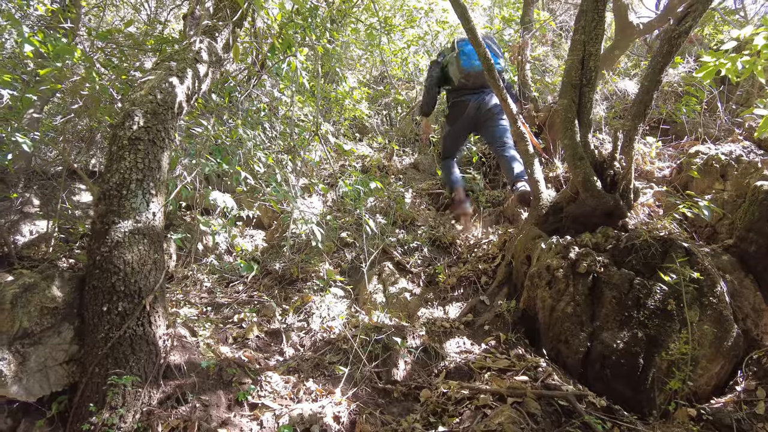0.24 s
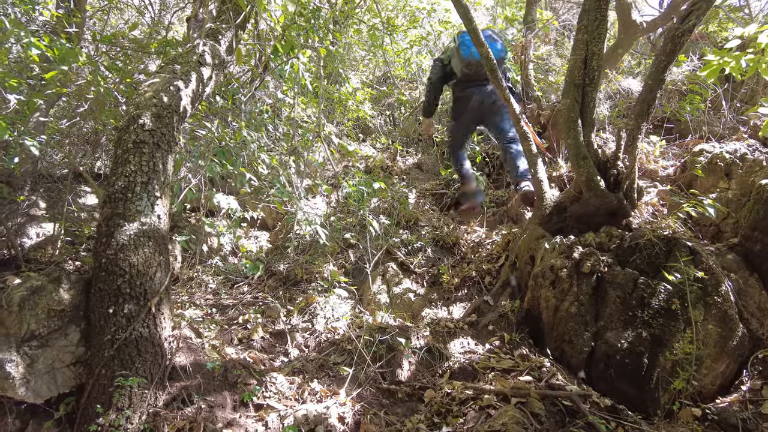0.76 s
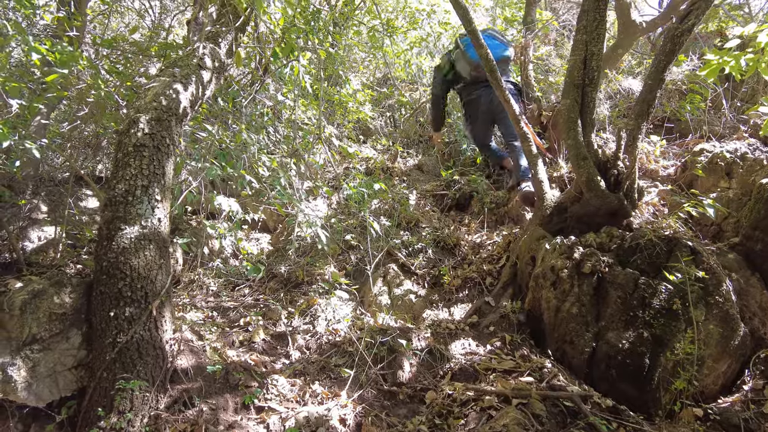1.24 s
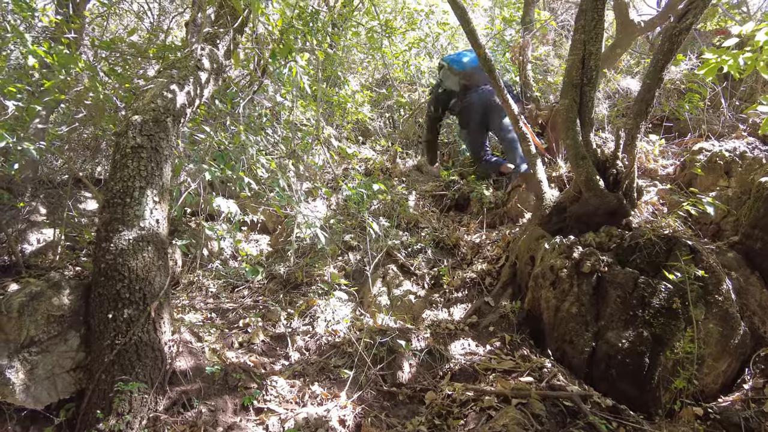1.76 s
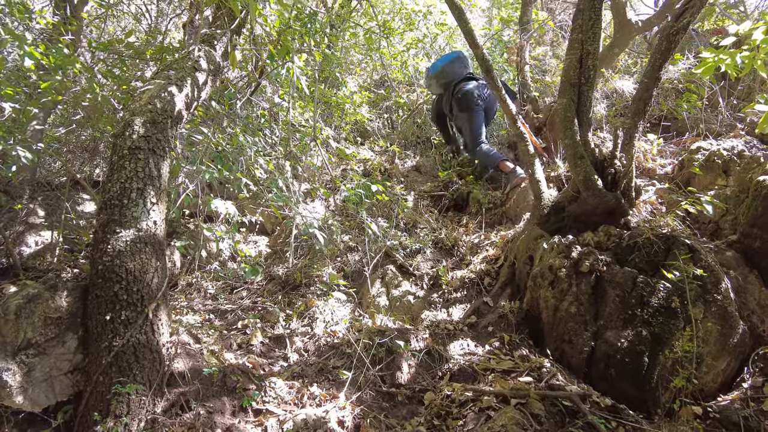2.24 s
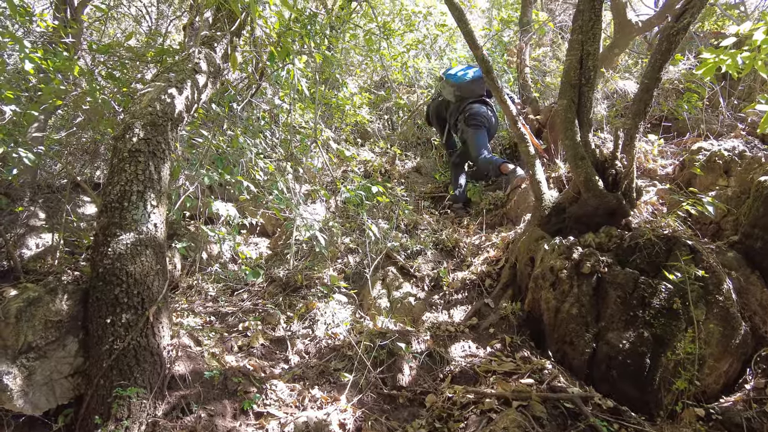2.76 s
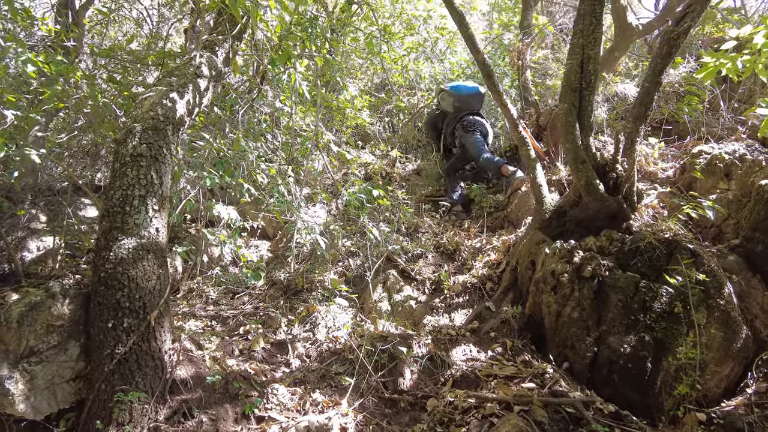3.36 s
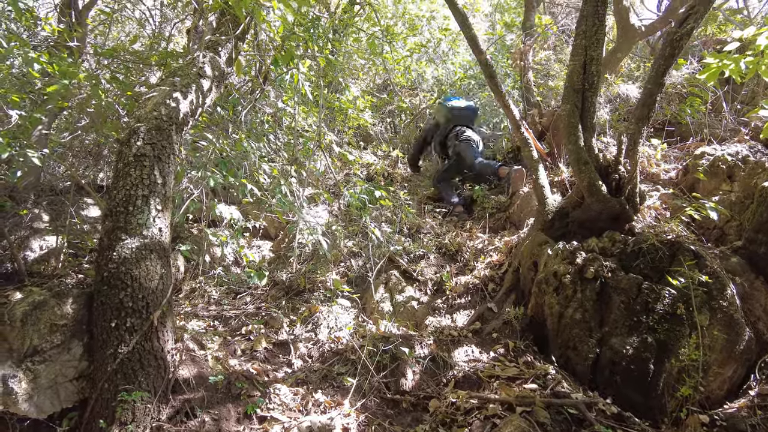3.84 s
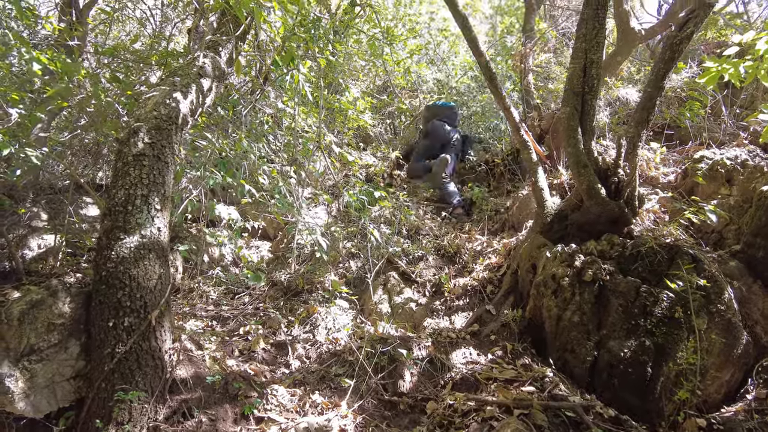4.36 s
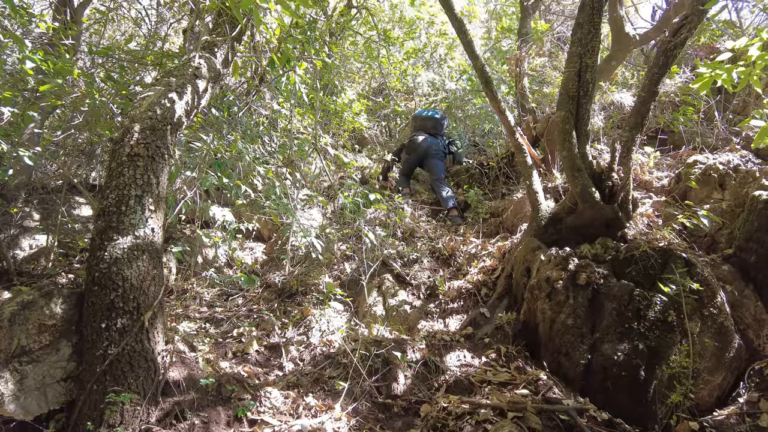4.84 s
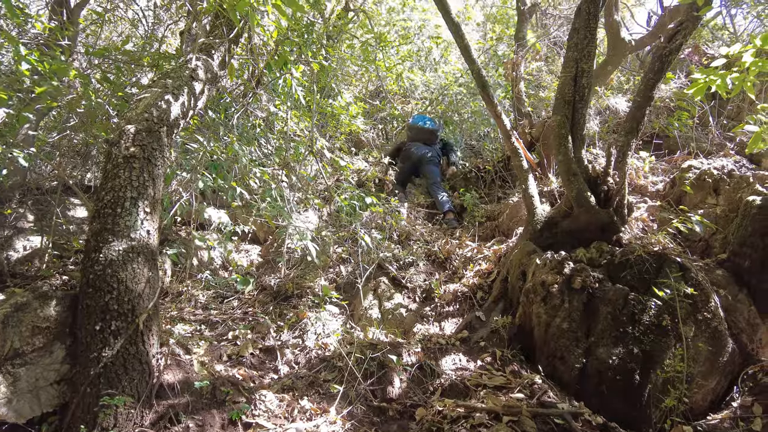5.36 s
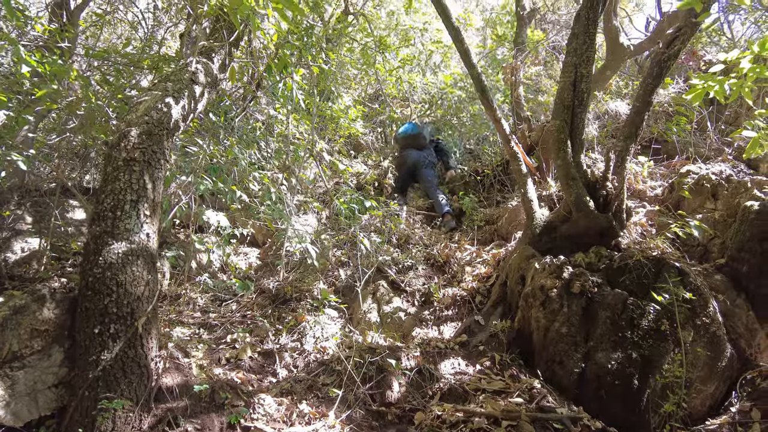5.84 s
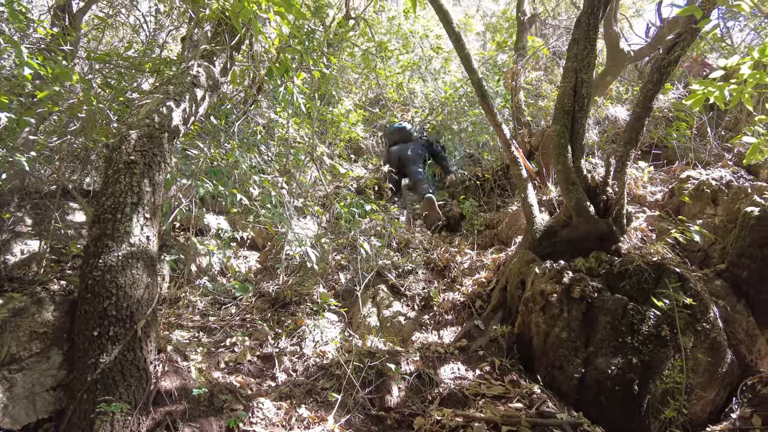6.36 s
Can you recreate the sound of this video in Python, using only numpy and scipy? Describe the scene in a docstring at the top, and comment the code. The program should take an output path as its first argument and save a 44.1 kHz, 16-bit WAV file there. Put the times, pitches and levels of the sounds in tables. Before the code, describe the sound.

Some metres from a microphone near the ground, one hiker scrambles uphill through dry leaves. Soft crunches and light ticks open, then twigs crack around one second and hardest near two, followed by a dense flurry of crackling. A resonant woody snap comes midway, another cluster of crunches near five seconds, then it thins out. Quiet canopy hiss and faint wind lie beneath.

```python
"""Dry leaves crumple in dense tiny clicks as a hiker climbs a wooded slope, some metres from a microphone.
Crunches and settling leaves are noise shaped by random fractures, with small ringing flakes on top.
Twigs crack as short noise bursts with debris and a brief ring; boots thud as low, sagging wobbles.
Behind them the canopy hisses as flickering noise and a light wind rumbles as very low noise.
"""
import sys
import numpy as np
from scipy import signal
from scipy.fft import rfft, irfft, next_fast_len
from scipy.io import wavfile
from scipy.ndimage import uniform_filter1d

SR = 44100
rng = np.random.default_rng(int(sys.argv[2]) if len(sys.argv) > 2 else 0)


def master_out(mix):
    """Clip the mix to full scale and print it as 16-bit PCM to the path in sys.argv[1]."""
    frames = np.transpose(np.atleast_2d(mix))
    ceiling = np.clip(frames, -1, 1)
    pcm = np.round(ceiling * 32767).astype(np.int16)
    wavfile.write(sys.argv[1], SR, pcm)


N = 290619
TIME = np.arange(N) / SR  # seconds
BANDS_HZ = 180 * 2 ** np.arange(0, 6.7, 2 / 3)  # band centres, two thirds of an octave apart

# Crunches of leaves underfoot: peak_s, level_db, rise_s (per 20 dB), fall_s (per 20 dB),
# weight_db (lows), crisp_db (per octave above 4000 Hz)
LEAF_CRUNCHES = [(0.0, -36, .05, 0.19, 2.5, 2), (0.2, -43, 0.19, 0.53, -1, 2),
                 (0.336, -35.5, 0.11, 0.073, 7.5, 2), (0.57, -47.5, 0.045, 0.11, -4, 3),
                 (0.789, -45.5, 0.19, 0.14, -5, 3), (1.028, -39, 0.13, 0.041, 1.5, 2.5),
                 (1.195, -45.5, 0.048, 0.23, -3.5, 1), (1.705, -50, 0.041, 0.17, 9, -26),
                 (1.895, -32.5, 0.03, 0.1, 1.5, -6), (2.034, -43, 0.031, 0.13, 5, 3.5),
                 (2.215, -51, 0.027, 0.058, -3, 6), (2.309, -38, 0.017, 0.18, -1, 3.5),
                 (2.386, -31.5, 0.079, 0.18, -5.5, 2), (2.47, -36, 0.14, 0.093, -2.5, -4.5),
                 (2.54, -42.5, 0.034, 0.049, 2, -1), (2.6, -49, 0.11, 0.55, 3.5, 2.5),
                 (3.06, -43, 0.097, 0.067, 1.5, -6), (3.543, -39, .06, 0.086, 4.5, -15),
                 (3.945, -44.5, 0.027, 0.16, 6, 1.5), (4.07, -42.5, 0.12, 0.28, 4.5, 3),
                 (4.519, -41.5, 0.035, 0.089, 2.5, -3.5), (4.625, -35.5, 0.01, 0.17, -0.5, 2.5),
                 (4.675, -38, 0.067, 0.033, 10.5, 0.5), (4.808, -31.5, 0.012, 0.079, 7.5, 5),
                 (4.92, -47.5, 0.17, 0.5, 7, 1), (5.645, -36.5, 0.022, 0.062, -5, 1.5),
                 (5.9, -50, 0.29, .1, 2.5, -2), (6.45, -48, 0.24, 0.75, 1.5, -21)]
# Leaves settling between the crunches: time_s, level_db
SETTLING_LEVEL = [(0, -52), (1.3, -50.5), (1.65, -53), (2.2, -53), (2.9, -48.5), (3.7, -51), (4.4, -52),
                  (5.4, -54), (6.0, -56), (6.59, -49.5)]
# Tone colour of leaves and cracks: pitch_hz, level_db
LEAF_COLOUR = [(88, -31), (150, -7), (528, -5), (594, -6.5), (972, -3), (1140, -9.5), (1790, -3.5),
               (2350, -3.5), (4870, -4.5), (5930, -4), (7080, -6.5), (15300, -13.5), (16500, -15)]
# How alike the leaves sound left and right: pitch_hz, likeness (0 to 1)
LEAF_LIKENESS = [(150, 0.99), (500, 0.25), (1400, 0.74), (4000, 0.31), (12000, 0.15)]
# Twigs breaking: start_s, crack_db, ring_pitch_hz, ring_db (relative to the crack, before RING_DB),
# weight_db (lows), crisp_db (per octave above 4000 Hz)
TWIG_SNAPS = [(0.147, -29.5, 1190, -12, 10, -2), (0.559, -41.5, 1800, -6, 10, 5),
              (0.8, -30, 5300, 4, -29, -4), (1.017, -32, 1510, -2, -6, 2),
              (1.101, -19.5, 716, -10, -1, -3.5), (1.19, -37.5, 2690, 2, -6, 2),
              (1.288, -36, 1540, -2, 4, 2), (1.681, -44, 1260, 7, 14, -14),
              (1.705, -31.5, 1220, -0.5, 10.5, -10), (1.708, -33.5, 1790, -1.5, 4, -4),
              (1.769, -35, 520, -1.5, 11, -1), (1.868, -21.5, 2020, -12.5, 1, 0.5),
              (1.89, -21, 5300, -10, 0, 2), (1.893, -11, 1205, -13, -2.5, -3),
              (2.034, -31, 5370, -1, -14, 3), (2.037, -32.5, 3850, -0.5, -9, 7.5),
              (2.214, -34.5, 4480, -5, 3, 8.5), (2.296, -29, 1770, -15, 1, 0.5),
              (2.31, -35.5, 6800, 10, -10, 1), (2.372, -16, 6270, -7, -43, 3),
              (2.407, -23, 2740, -15, -8, -1), (2.432, -34, 5600, 2, -10, 7),
              (2.536, -33, 4670, -3, -15, 0), (2.592, -30, 2960, -1.5, 6, 2.5),
              (2.644, -33, 6000, -2, -21, 3), (2.819, -39, 5030, 3, -10, 2), (3.098, -31, 830, -3, -9, -1),
              (3.148, -36.5, 1105, 1, -1, -8), (3.538, -16.5, 1388, 6, 4, 4),
              (3.935, -31, 1370, -6.5, -6, 2.5), (4.025, -34, 5850, -14, -3, 4),
              (4.067, -36, 6750, 2, -6, 10.5), (4.283, -39, 790, 2, -3, -8),
              (4.372, -39.5, 1040, -6, -3, 8), (4.515, -35.5, 470, -6, 7.5, 7.5),
              (4.627, -26.5, 4370, -3, -17, 7), (4.675, -29.5, 1335, -2, -6, -8),
              (4.804, -16, 803, -8, -8, 5), (4.911, -38, 735, -3, 9, -4), (5.37, -41.5, 6060, 1, -14, 4),
              (5.63, -31, 4340, -6, -4, -3), (5.642, -27.5, 342, -14, 4.5, 4)]
# Ringing tones of a broken twig: pitch_ratio, level_db, t60_s (time to fall 60 dB at a 1400 Hz ring pitch)
TWIG_TONES = [(.853, -22.5, 0.17), (.9, -13.5, 0.088), (1, -2.5, 0.043), (1.04, -1, 0.015),
              (1.15, -10, 0.06), (1.286, -8.5, 0.027), (.445, -18, 0.03), (1.85, -39, .03)]
# Boots landing on soil: start_s, level_db, start_pitch_hz, t60_s (time to fall 60 dB)
BOOT_THUDS = [(0.332, -35.5, 60.5, 0.3), (.338, -39.5, 86, 0.19), (1.01, -50.5, 190, .1),
              (1.891, -36, 82, 0.12), (1.896, -33, 350, 0.046), (3.54, -49.5, 115, 0.077),
              (3.723, -39, 283, 0.049), (4.451, -50, 127, 0.11), (4.661, -42, 315, 0.093),
              (4.805, -44, 130, 0.13), (4.807, -41, 227, .1), (6.423, -49, 147, 0.25)]
# The breeze in the canopy: time_s, level_db, low_mid_db (extra level around LOW_MID_HZ)
CANOPY_BREEZE = [(0, -56, 2), (0.55, -58.5, -1), (0.88, -59.5, -5), (1.1, -58.5, 5), (1.5, -60.5, 1),
                 (2.5, -57, 2.5), (2.9, -59.5, -3), (3.1, -57.5, 4), (3.38, -60.5, -3), (3.75, -58.5, 2.5),
                 (4.2, -56.5, 1.5), (5.1, -59, 2.5), (5.45, -58, -9), (5.75, -59.5, 4), (6.15, -59, -12),
                 (6.4, -58.5, -3), (6.59, -57, 6)]
# Tone colour of the canopy: pitch_hz, level_db
CANOPY_COLOUR = [(35, -25), (60, -15.5), (96, -6.5), (204, -12.5), (675, -22.5), (1110, -27.5), (1270, -12),
                 (1850, -24.5), (2240, -26), (2970, -17.5), (3580, -22.5), (6010, -20.5), (7080, -22.5),
                 (15000, -22.5), (16500, -26)]
# How alike the canopy sounds left and right: pitch_hz, likeness (0 to 1)
CANOPY_LIKENESS = [(100, 0.99), (300, 0.88), (700, 0.033), (1400, 0.79), (3000, 0.057), (8000, 0.035)]
# Wind rumble: time_s, level_db
WIND_LEVEL = [(0.0, -58), (0.07, -54), (0.29, -59), (0.33, -60), (0.48, -58), (3.43, -58.5), (3.82, -52),
              (3.85, -59.5), (3.98, -50.5), (4.2, -56.5), (6.46, -54.5), (6.59, -61)]

SETTLING_WEIGHT_DB, SETTLING_CRISP_DB = -1, -2.5
STIR_DB, STIRS_PER_S = 3, 9  # the settling leaves come and go
CRACK_RISE_MS, CRACK_S = 0.3, 0.00065  # CRACK_S: time to fall to 37 %
DEBRIS_DB, DEBRIS_T60_S = -15, 0.069
DEBRIS_DB_PER_RING_DB = -0.55  # wood that breaks cleanly rings more and sheds less
RING_DB = -8
RING_ROUGH, RING_WAVERS_PER_S, RING_CLEAN_S = 0.35, 300, 0.008  # unevenness grows over RING_CLEAN_S
RING_RISE_CYCLES, GENTLE_DB = 0.76, -33  # breaks quieter than GENTLE_DB ring up more slowly
GENTLE_CYCLES_PER_DB = 0.5
LOW_MID_HZ, WIND_ALIKE = 900, 0.997
GROUND_ECHO_MS, GROUND_SHARE = 0.668, 0.13
PORT_LAG_MS, RIGHT_TREBLE_DB = 0.014, 1.9
TOP_HZ = 16100


def leaves():
    """Fractures excite every band together, each band has fractures of its own, loose flakes ring on top."""
    settling_db = np.interp(TIME, *np.transpose(SETTLING_LEVEL)) + STIR_DB * walk(STIRS_PER_S)
    power = undb(2 * np.vstack([crunch_db(), settling_db]))  # twice the dB turns level into power
    tilts = np.vstack([np.array(LEAF_CRUNCHES)[:, 4:], [SETTLING_WEIGHT_DB, SETTLING_CRISP_DB]])
    weight_db, crisp_db = tilts.T
    shared, out = crumple(400, 3.7, 0.0029), 0
    for hz in BANDS_HZ:
        grains = 0.38 * shared + 0.62 * crumple(600, 3.4, 0.0042)
        level = np.sqrt(undb(2 * tilt_db(hz, weight_db, crisp_db)) @ power)
        noise = pair(on_log(LEAF_LIKENESS, hz))
        out = out + level * band(grains * noise, hz)
    total_level = np.sqrt(power.sum(axis=0))
    out = out + total_level * undb(-9.5) * flakes(count=4000, cycles=10.0, spread_db=2.0)
    return colour(out, LEAF_COLOUR)


def crunch_db():
    """Level of every crunch over time: a straight rise and fall in dB about its peak."""
    s, db, rise_s, fall_s = np.array(LEAF_CRUNCHES)[:, :4, None].transpose(1, 0, 2)
    t = TIME - s
    rising, falling = -t / np.maximum(rise_s, .004), t / np.maximum(fall_s, .004)
    return db - 20 * np.where(t < 0, rising, falling)


def crumple(rate, spread_db, smear_s):
    """Envelope of leaf fractures: sudden, mostly small, rarely big, each dying within milliseconds; rms 1."""
    chance, size = rng.random(N), rng.exponential(size=N)
    clicks = (chance < rate / SR) * undb(2 * spread_db * np.minimum(size, 4))
    power = signal.lfilter([1], [1, -np.exp(-1 / (smear_s * SR))], clicks)
    return unit(np.sqrt(power + 1e-9))


def flakes(count, cycles, spread_db):
    """Single leaves flick free and ring briefly, each at its own pitch and place."""
    at, pitch, pan, size = rng.random((count, 4)).T
    hz, t = 1200 * 2 ** (3.5 * pitch)[:, None], np.arange(600) / SR
    fade = np.exp(-hz ** .5 * 60 * t / cycles)  # falls to 37 % in this many cycles at 3600 Hz
    ring = np.sin(2 * np.pi * hz * t) * fade * np.sqrt(hz / 3000)
    ring *= undb(-spread_db * np.log(size + 0.0019))[:, None]  # few are loud
    place = ((at * N).astype(int)[:, None] + np.arange(len(t))).ravel()
    sides = []
    for gain in (np.sqrt(pan), np.sqrt(1 - pan)):
        side = np.bincount(place, (gain[:, None] * ring).ravel(), N + len(t))
        sides.append(side[:N])
    return unit(np.array(sides))


def snaps():
    """A millisecond crack, then falling debris; the broken wood rings unevenly at a pitch set by its size."""
    t = np.arange(int(.2 * SR)) / SR
    drive = np.zeros((len(BANDS_HZ), N + len(t)))  # noise power in each band
    ring = np.zeros((2, N + len(t)))
    patchy = np.pad(.5 + 0.46 * crumple(600, 5.0, 0.001), (0, len(t)))
    waver = np.pad([walk(RING_WAVERS_PER_S) for _ in "LR"], ((0, 0), (0, len(t))))
    rise = np.minimum(1000 * t / CRACK_RISE_MS, 1)
    for s, crack_db, hz, ring_db, weight_db, crisp_db in TWIG_SNAPS:
        at = slice(int(s * SR), int(s * SR) + len(t))
        debris_db = DEBRIS_DB + DEBRIS_DB_PER_RING_DB * ring_db
        debris = undb(debris_db - 60 * t / DEBRIS_T60_S) * patchy[at]
        blow = undb(crack_db) * rise * np.hypot(np.exp(-t / CRACK_S), debris)
        tilt = undb([tilt_db(f, weight_db, crisp_db) for f in BANDS_HZ])
        drive[:, at] += (tilt[:, None] * blow) ** 2
        uneven = 1 + RING_ROUGH * np.minimum(t / RING_CLEAN_S, 1) * waver[:, at]
        cycles = RING_RISE_CYCLES + GENTLE_CYCLES_PER_DB * max(GENTLE_DB - crack_db, 0)
        swing = np.minimum(t * hz / cycles, 1)
        for ratio, db, ring_t60 in TWIG_TONES:
            # thin twigs ring higher and shorter
            fade = undb(crack_db + ring_db + db - 60 * t / ring_t60 * np.sqrt(hz / 1400))
            ring[:, at] += swing * uneven * fade * np.sin(2 * np.pi * hz * ratio * t)
    noise, cracks = pair(0.83), 0
    for k, hz in enumerate(BANDS_HZ):
        # neighbouring bands take opposite signs
        cracks = cracks + band(np.sqrt(drive[k, :N]) * noise, hz) * (-1) ** k
    return colour(cracks, LEAF_COLOUR) + undb(RING_DB) * ring[:, :N]


def tilt_db(hz, weight_db, crisp_db):
    """More weight lifts the lows, in full below 1100 Hz; crispness lifts the highs above 4000 Hz."""
    return np.clip(np.log2(2200 / hz), 0, 1) * weight_db + max(np.log2(hz / 4000), 0) * crisp_db


def thuds():
    """The soil gives with a soft push and a damped low wobble that sags in pitch."""
    t = np.arange(int(.3 * SR)) / SR
    out = np.zeros(N + len(t))
    for s, level_db, hz, t60 in BOOT_THUDS:
        i = int(s * SR)
        shape = (1 - np.exp(-t / 0.0013)) * undb(level_db - 60 * t / max(t60, .02))
        out[i:i + len(t)] += shape * np.sin(2 * np.pi * hz * t * (1 - 0.44 * t))
    return out[:N]


def near_ground(x):
    """The soil under the microphone returns the sound a moment later; the right hears it first and brighter."""
    size = next_fast_len(N + 256)
    hz = np.fft.rfftfreq(size, 1 / SR)

    def late(ms):
        """A delay turns the phase of each pitch in step with its frequency."""
        return np.exp(-2j * np.pi * hz * ms / 1000)

    shade = undb(RIGHT_TREBLE_DB / 2 * np.clip(hz / 8000, 0, 1))
    ports = np.array([late(PORT_LAG_MS) / shade, shade])  # left, right
    echo = 1 + GROUND_SHARE * late(GROUND_ECHO_MS)
    return irfft(rfft(x, size) * ports * echo, size)[:, :N]


def canopy():
    """Far leaves in the breeze: bands swell slightly together and flicker alone; the low mids rise and dip."""
    s, level_db, low_mid_db = np.transpose(CANOPY_BREEZE)
    out, swell, hollow_db = 0, walk(0.8), np.interp(TIME, s, low_mid_db)
    for hz in np.append([71, 113], BANDS_HZ):
        share = np.exp(-np.log2(hz / LOW_MID_HZ) ** 2)  # strongest at LOW_MID_HZ
        band_db = 0.27 * swell + 1.74 * walk(5.4) + share * hollow_db
        out = out + undb(band_db) * band(pair(on_log(CANOPY_LIKENESS, hz)), hz)
    return undb(np.interp(TIME, s, level_db)) * unit(colour(out, CANOPY_COLOUR))


def wind():
    """Low pressure swings on the microphone as rising and falling noise, nearly the same left and right."""
    low = signal.butter(4, 46, fs=SR, output="sos")
    high = signal.butter(2, 17, "highpass", fs=SR, output="sos")
    rumble = signal.sosfilt(np.vstack([low, high]), pair(WIND_ALIKE))
    return undb(np.interp(TIME, *np.transpose(WIND_LEVEL))) * unit(rumble)


def undb(db):
    """Turn decibels into a plain amplitude factor."""
    return 10 ** (np.asarray(db) / 20)


def unit(x):
    """Scale a sound to rms 1."""
    return x / np.sqrt(np.mean(x ** 2))


def on_log(table, hz):
    """Value of (Hz, value) points on a log-frequency axis."""
    f, v = np.transpose(table)
    return np.interp(np.log(hz), np.log(f), v)


def band(x, hz):
    """Keep a band two thirds of an octave wide around a pitch."""
    edges = [hz / 2 ** (1 / 3), min(hz * 2 ** (1 / 3), .49 * SR)]
    return signal.sosfilt(signal.butter(2, edges, "bandpass", fs=SR, output="sos"), x)


def walk(rate):
    """Random levels held 1 / rate s and smoothed twice; spread near 1."""
    k = int(SR / rate)
    steps = np.repeat(rng.standard_normal(N // k + 1), k)
    return 1.05 * uniform_filter1d(uniform_filter1d(steps, k), k)[:N]


def pair(alike):
    """Left and right noise with a given likeness: a shared part and a part of opposite sign."""
    mid, side = rng.standard_normal((2, N))
    c = np.clip(alike, 0, 1)
    return np.sqrt((1 + c) / 2) * mid + np.sqrt((1 - c) / 2) * side * np.array([[1], [-1]])


def colour(x, table):
    """Filter by (Hz, dB) points without sounding ahead of time, using the folded cepstrum."""
    hz = np.maximum(np.fft.rfftfreq(2048, 1 / SR), 1)
    c = irfft(np.log(undb(on_log(table, hz))))
    c[1:1024], c[1025:] = 2 * c[1:1024], 0  # fold the later half onto the earlier
    response = irfft(np.exp(rfft(c)))[None, :1024]
    return signal.oaconvolve(x, response)[:, :N]


def scene():
    """Leaves and twigs pass over the ground; thuds, canopy and wind are added directly."""
    return near_ground(leaves() + snaps()) + thuds() + canopy() + wind()


def record(dry):
    """A steep low-pass cuts the top."""
    return signal.sosfilt(signal.ellip(10, .2, 70, TOP_HZ, fs=SR, output="sos"), dry)


dry = scene()
out = record(dry)
master_out(out)
```